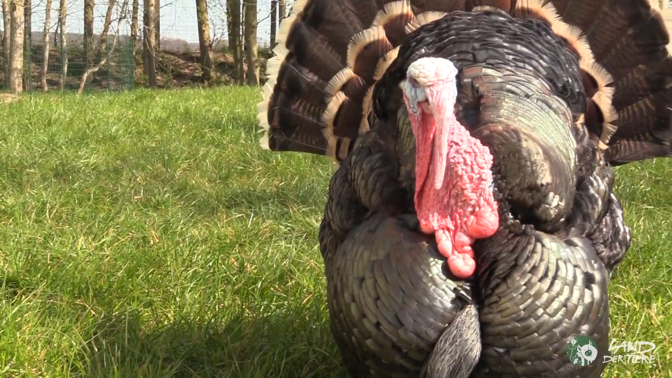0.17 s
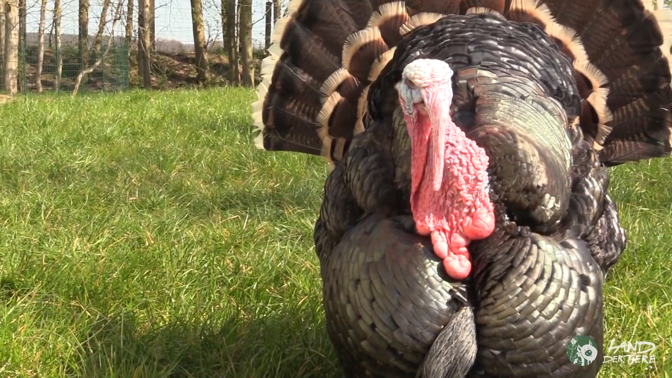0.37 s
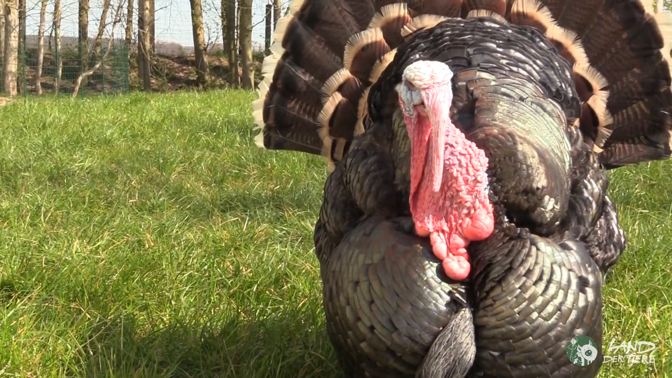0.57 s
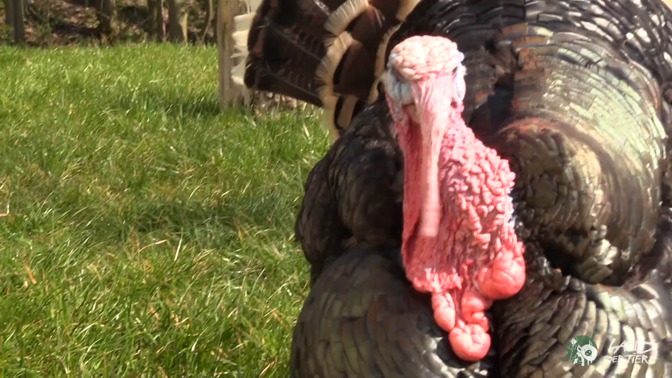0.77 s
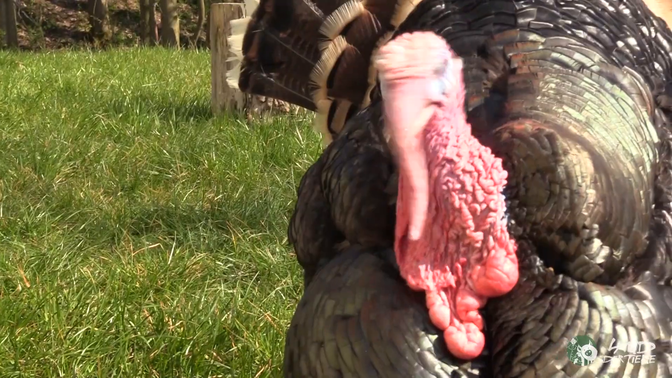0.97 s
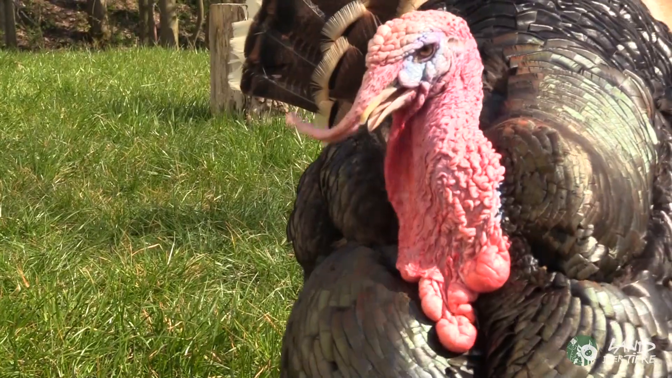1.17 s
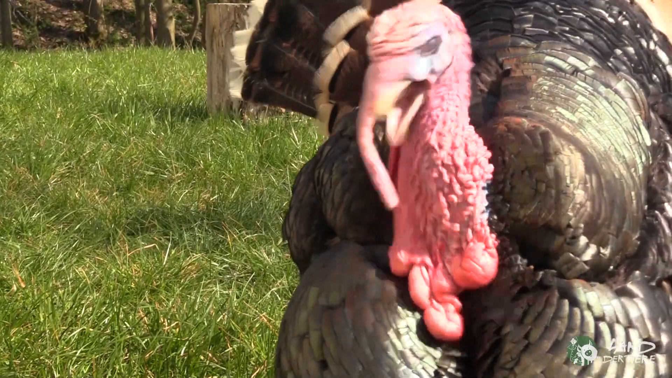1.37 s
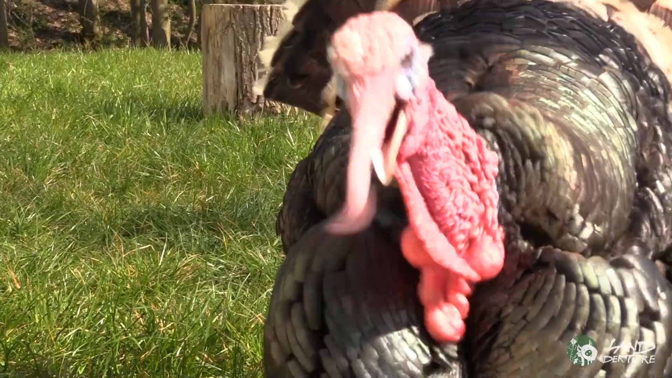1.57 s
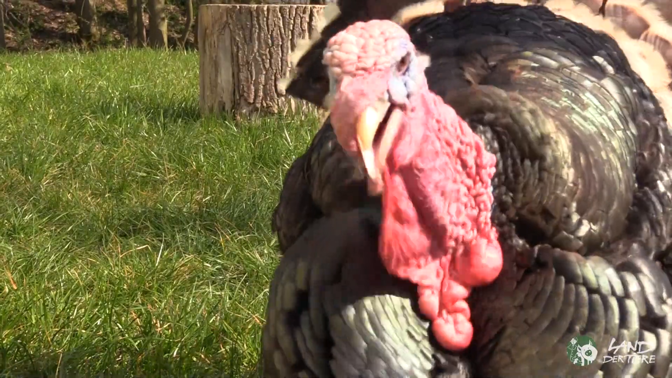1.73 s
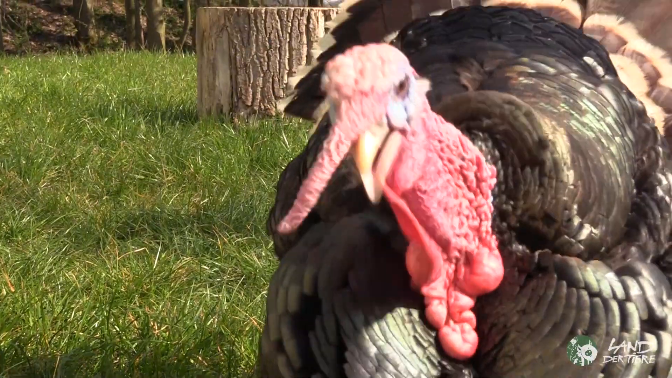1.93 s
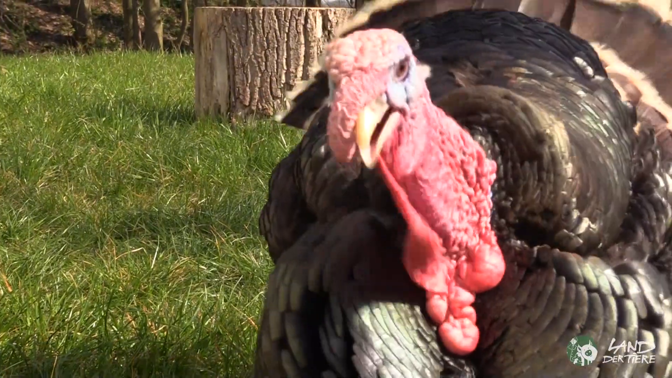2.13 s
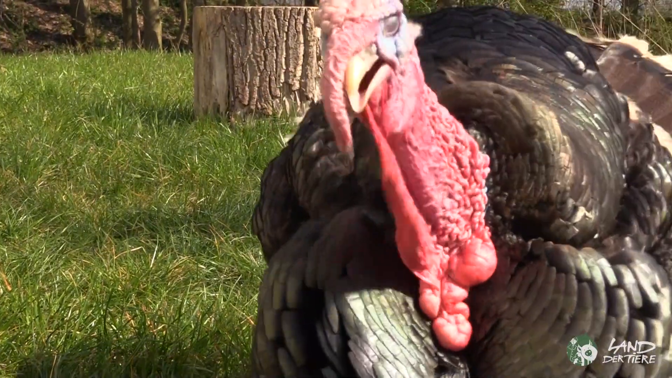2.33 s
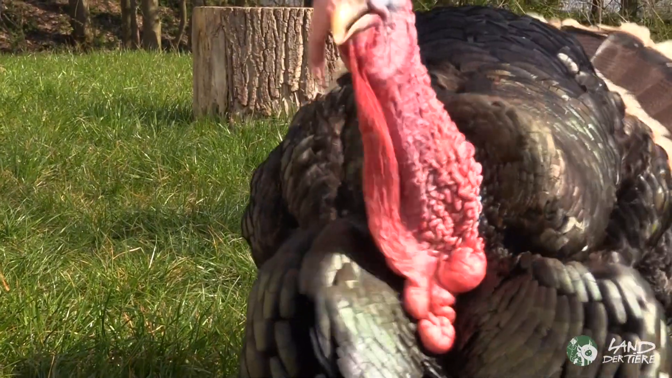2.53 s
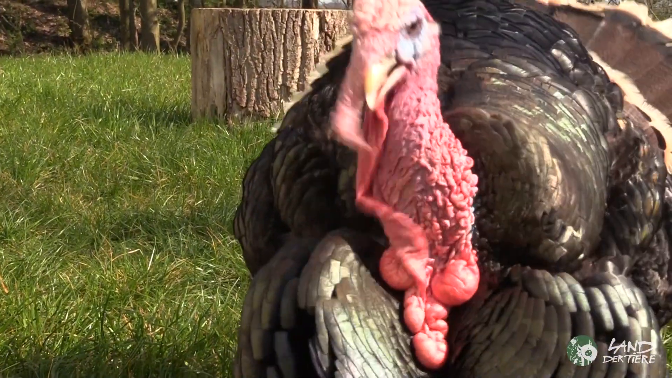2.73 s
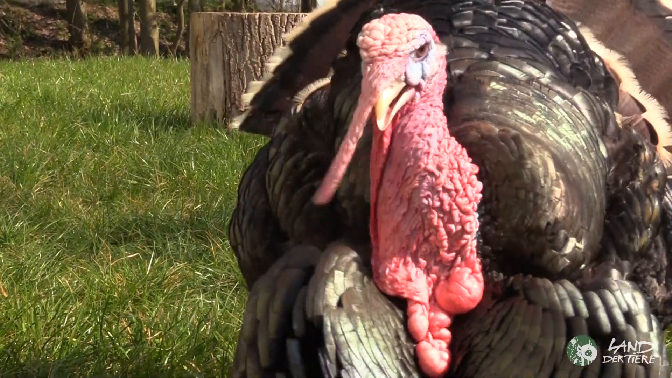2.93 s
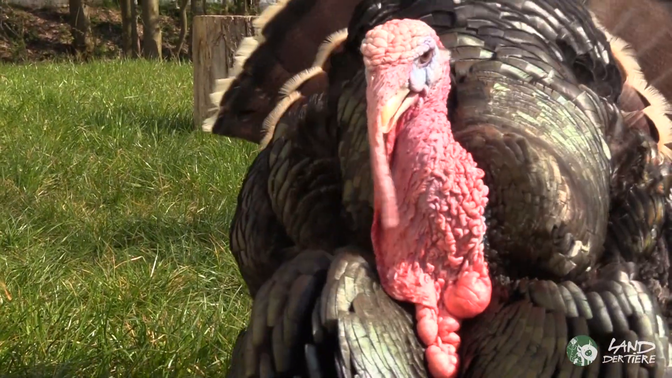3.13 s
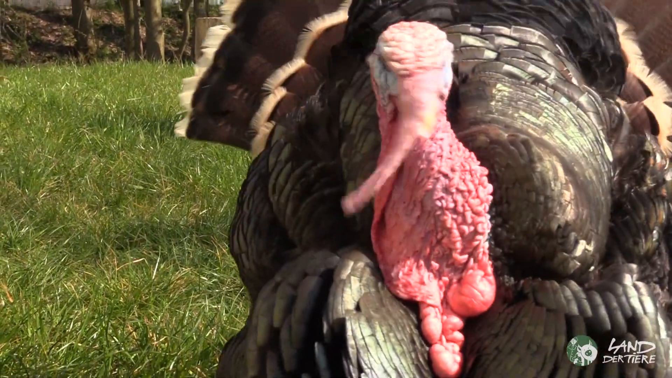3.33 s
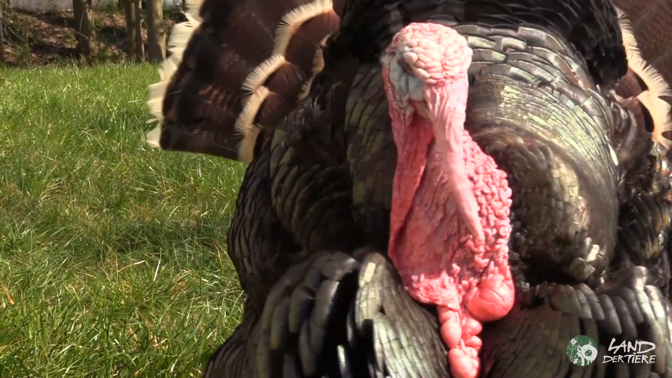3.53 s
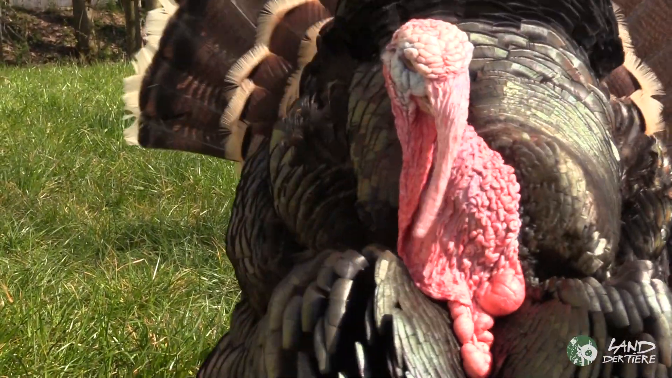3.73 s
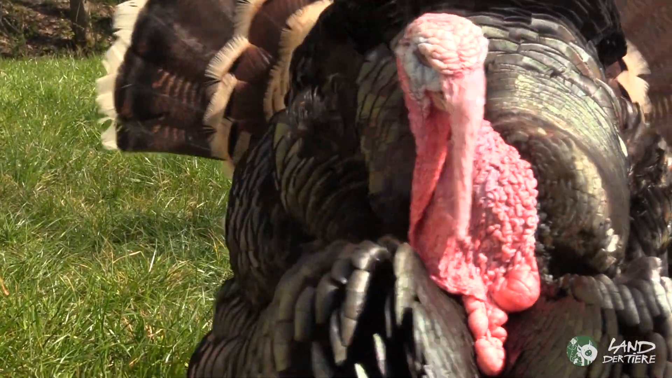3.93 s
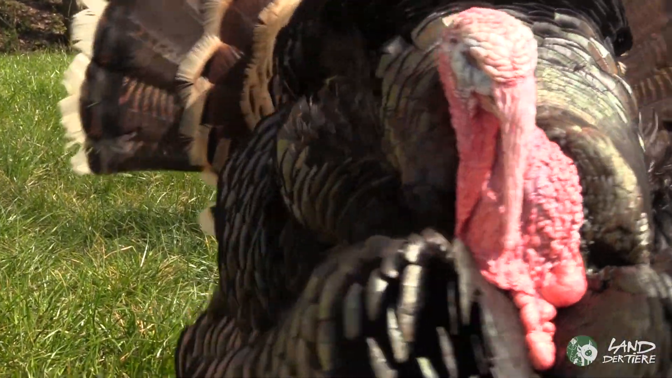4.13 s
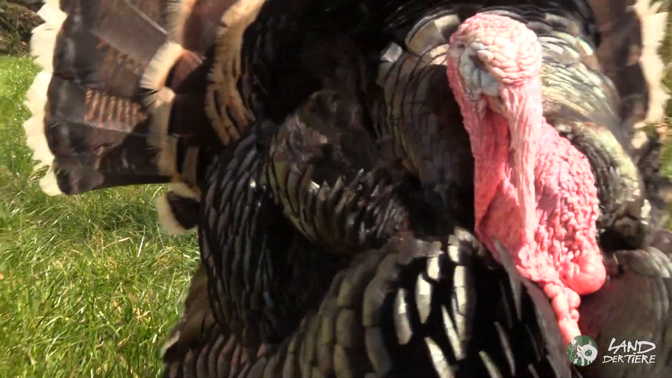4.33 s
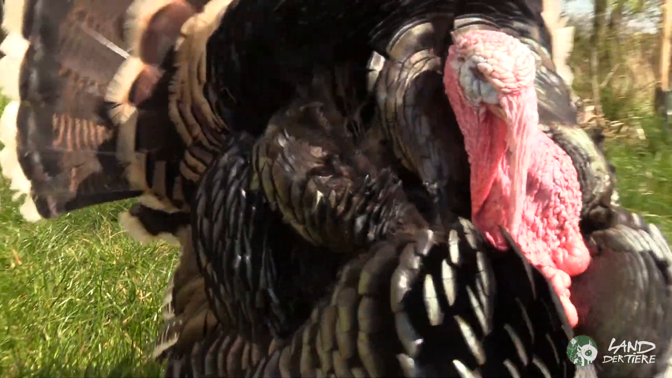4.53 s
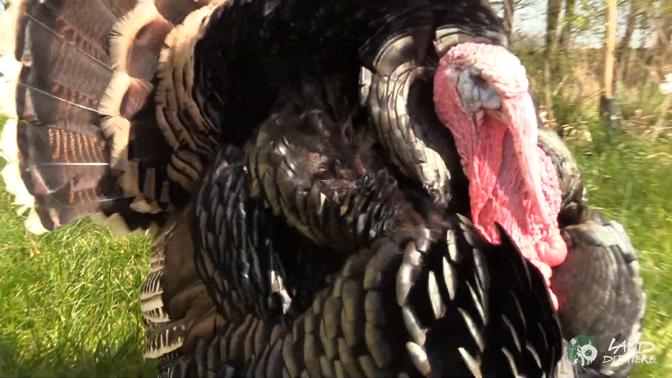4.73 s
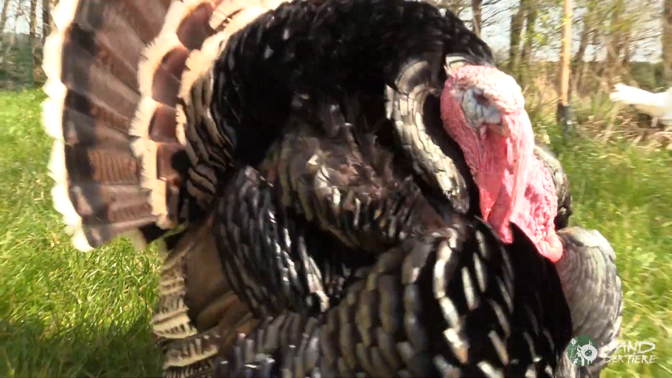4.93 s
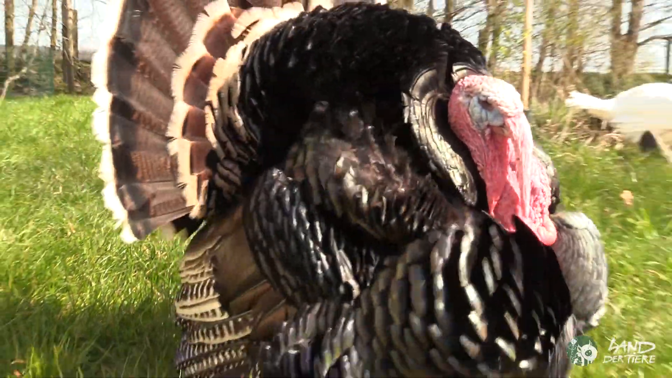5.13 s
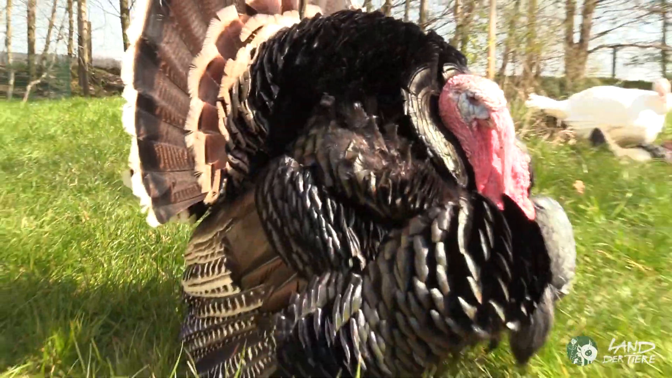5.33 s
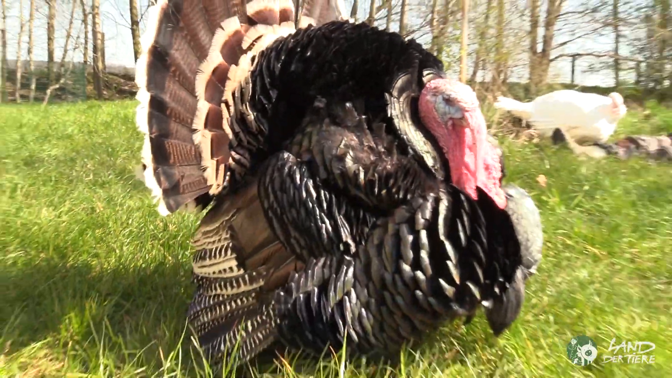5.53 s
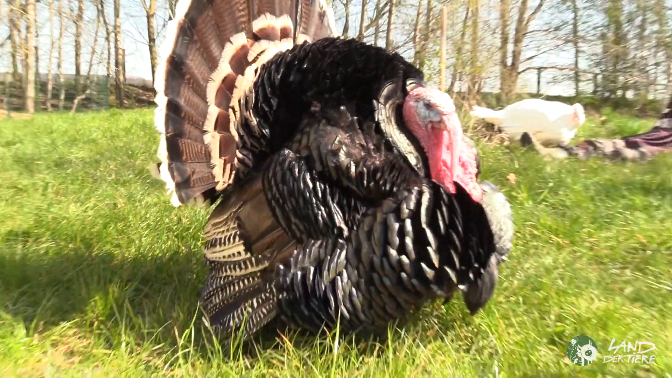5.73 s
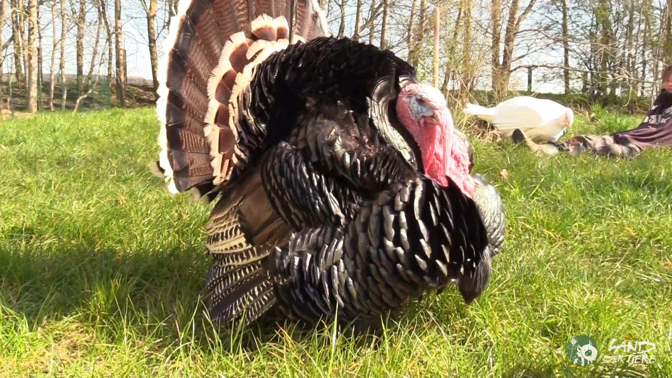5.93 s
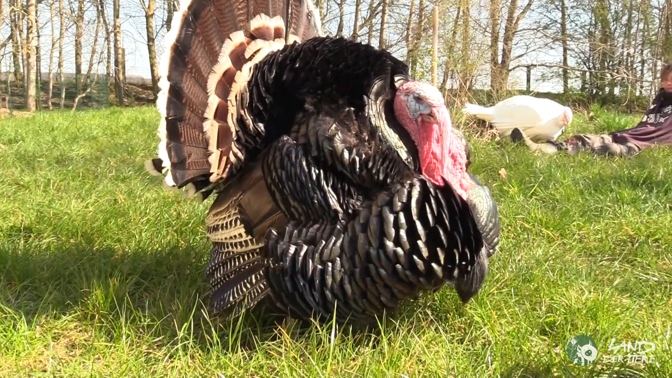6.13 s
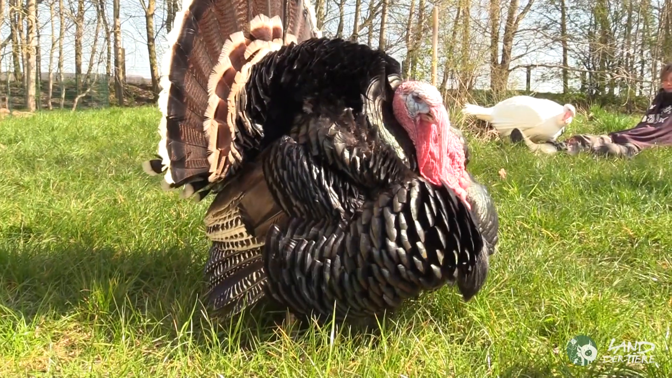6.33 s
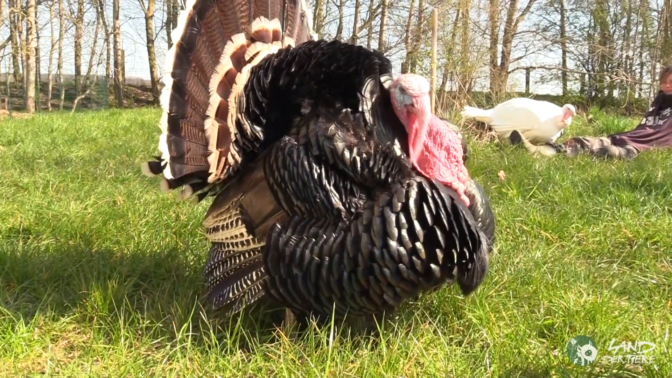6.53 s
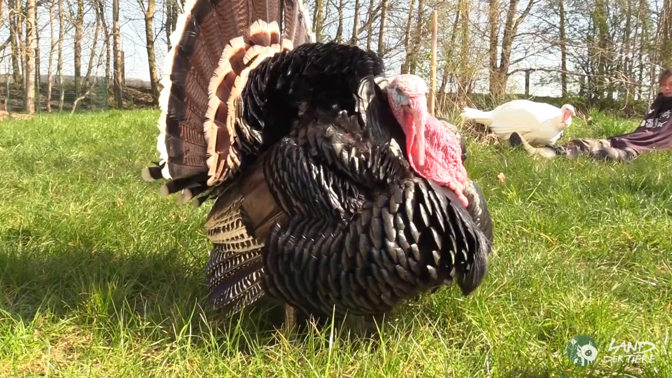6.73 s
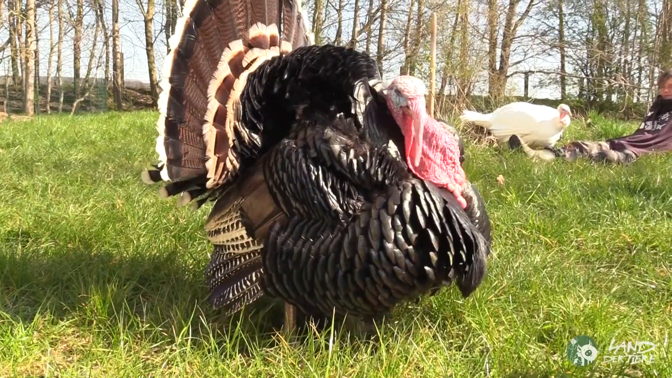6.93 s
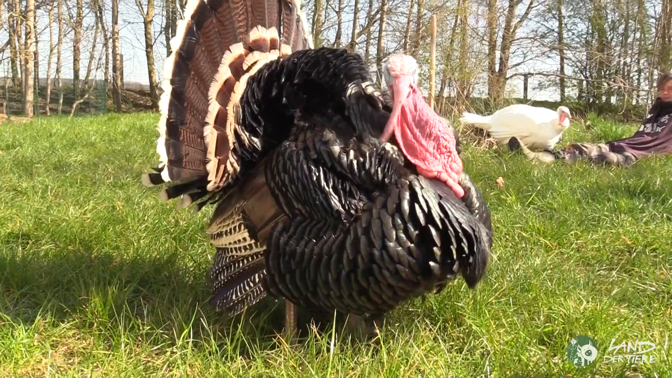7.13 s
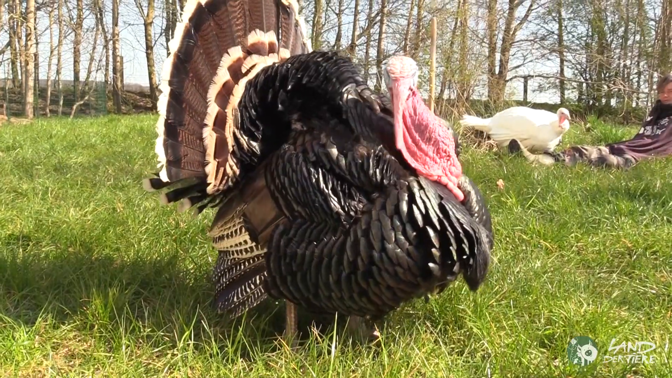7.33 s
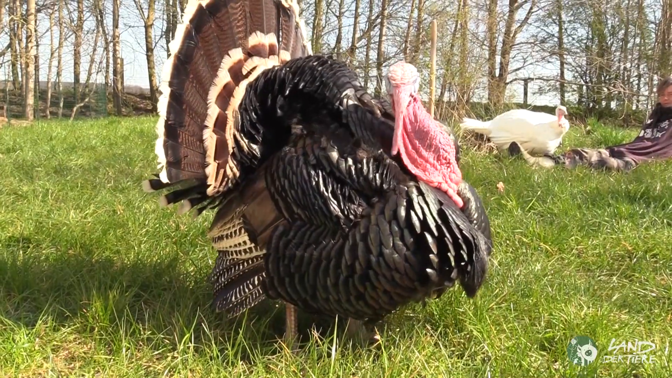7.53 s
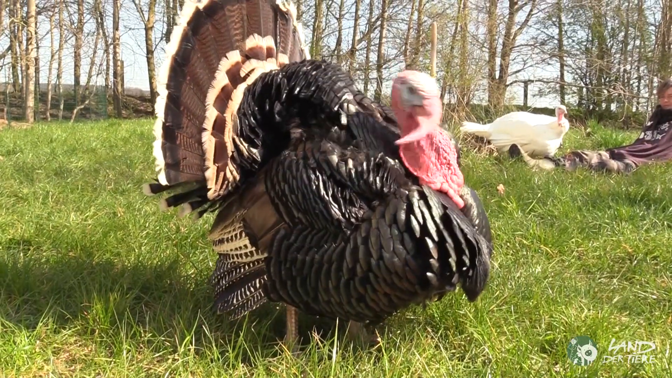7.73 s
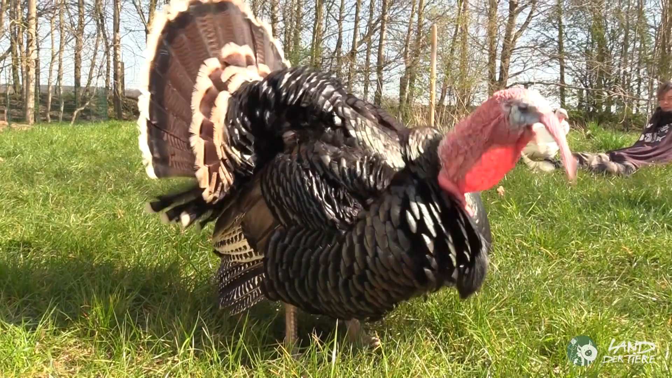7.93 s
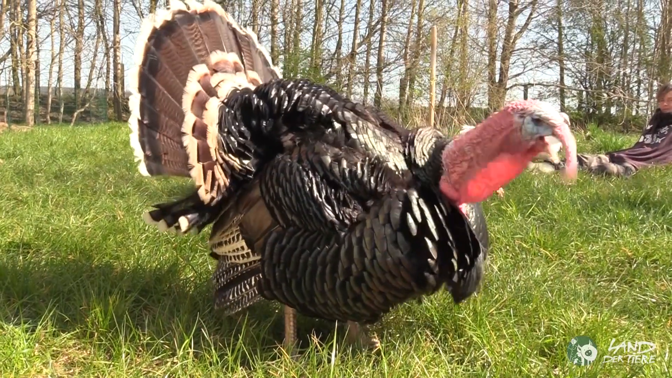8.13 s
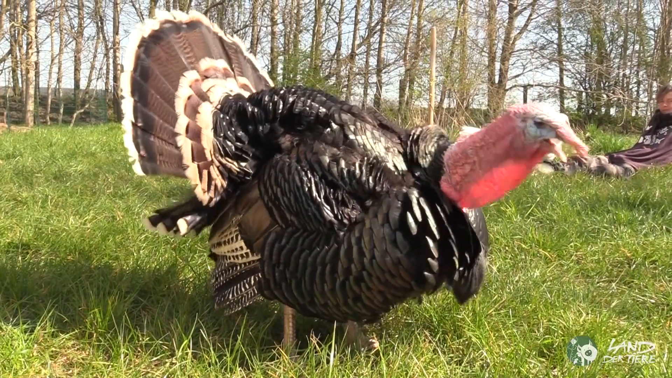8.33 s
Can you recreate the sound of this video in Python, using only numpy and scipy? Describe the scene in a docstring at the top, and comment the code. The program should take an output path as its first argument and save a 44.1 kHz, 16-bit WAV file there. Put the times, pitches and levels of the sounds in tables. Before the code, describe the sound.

Close, dry outdoor sound on an open meadow with soft airy background and a thin, short echo. A turkey clicks in his throat, gobbles harshly for just over a second, then falls quiet with feather rustle and small pops. A hissing spit comes with a low chest boom, later a pulsing drum note. After soft steps and plumage swishes he breaks into another rattling gobble.

```python
"""On a meadow, a tom turkey struts a metre or two from the microphone. He gobbles twice: the two sides of his
syrinx (voice box) trade low notes and falling yelps in a fast tumble, built from gliding stacks of harmonics.
Dry throat pops are short rings, spits are bursts of noise, and the deep chest drumming is a slow, pulsing tone.
Feet thud and feathers brush as shaped noise, over a quiet outdoor background, a faint hum and far-off songbirds.
A thin echo follows the voice."""
import sys
import numpy as np
from scipy import signal
from scipy.fft import rfft, irfft, next_fast_len
from scipy.io import wavfile
from scipy.ndimage import uniform_filter1d, minimum_filter1d

SR = 44100
rng = np.random.default_rng(int(sys.argv[2]) if len(sys.argv) > 2 else 0)


def unload_wav(signal):
    """Save mono or channel-first audio to the path in sys.argv[1] as 16-bit WAV at rate SR, clipped to [-1, 1]."""
    wavfile.write(
        sys.argv[1],
        SR,
        np.round(np.clip(np.atleast_2d(signal).T, -1, 1) * 32767).astype(np.int16),
    )


N = 369999
TIME = np.arange(N) / SR  # seconds
TOP_HZ = 15700  # the sound is cut above this
FOOT_HZ = 583.5  # low note that ends a yelp

# tone colour of air spat through the beak: f/Hz, level/dB
SPIT_COLOUR = [(290, -63), (500, -41), (737, -11), (1150, -25.5), (1450, -3), (1880, -7.5), (2540, 0.5),
               (3800, -8), (4600, -8), (5500, -19.5), (6900, -11.5), (8700, -22.5), (11500, -22),
               (15500, -40)]
# dull tone colour of a footfall, also used for flutter and shivering feathers: f/Hz, level/dB
STEP_COLOUR = [(30, -16.5), (80, -4), (170, -3.5), (330, -2), (520, -22.5), (1200, -14.5), (4000, -57)]
# bright tone colour of feathers, also used for cracks and crunches: f/Hz, level/dB
FEATHER_COLOUR = [(300, -17), (1200, -3.5), (3000, 2), (5000, -8), (8000, -6.5), (12000, -22), (16000, -48)]


def undb(db):
    """Turn decibels into a gain."""
    return 10 ** (np.asarray(db) / 20)


def unit(x):
    """Scale to an rms (average strength) of 1."""
    return x / np.sqrt(np.mean(x ** 2) + 1e-18)


def colour(points, hz):
    """Read the gain at the given frequencies from a list of (f/Hz, level/dB) points."""
    f, db = np.transpose(points)
    return undb(np.interp(np.log(np.maximum(hz, 1)), np.log(f), db))


def hiss(points, n):
    """Shape noise to a tone colour, with an rms of 1."""
    spectrum = rfft(rng.standard_normal(n))
    return unit(irfft(spectrum * colour(points, np.fft.rfftfreq(n, 1 / SR)), n))


def wide_hiss(points, n, width):
    """Make stereo noise; width is the share of its power in the left-right difference."""
    size = next_fast_len(n)
    mid = hiss(points, size)[:n]
    side = hiss(points, size)[:n]
    return np.sqrt(1 - width) * mid + np.sqrt(width) * np.array([side, -side])


def wobble(n, rate):
    """Join random values by straight lines, rate of them a second."""
    k = np.arange(n) * rate / SR
    count = int(k[-1]) + 2
    return np.interp(k, np.arange(count), rng.standard_normal(count))


def pan(db):
    """Give the left and right gains for a level difference, left minus right."""
    return undb(np.array([[db], [-db]]) / 2)


def add(out, s, x):
    """Mix x into out from time s (seconds) on."""
    i = max(int(s * SR), 0)
    out[:, i:i + x.shape[-1]] += x[..., :max(N - i, 0)]


def swishes(table, points, width, grain_db):
    """Grainy bursts of noise, each swelling and fading once."""
    out = np.zeros((2, N))
    for s, length, db in table:
        n = int(length * SR)
        swell = np.sin(np.linspace(0, np.pi, n))
        grain = undb(db + grain_db * wobble(n, 400))
        add(out, s, grain * swell * wide_hiss(points, n, width))
    return out


def background(rumble_db=2, air_db=1.0, grass_db=1, crackle_db=2):
    """Distant rumble, wide moving air and a fine crackle of grass and plumage, all noise of drifting level."""
    # levels before the gains above: t/s, distant rumble/dB, air/dB, hiss of grass and plumage/dB
    drift = [(0, -49.5, -44, -57), (.9, -52, -47.5, -59.5), (1.4, -52.5, -46.5, -59),
             (2.6, -61, -53.5, -64.5), (3.848, -59, -53, -68.5), (4.35, -51, -48.5, -59),
             (4.65, -49, -53, -52), (5.4, -49.5, -48, -61), (6.199, -48, -45, -61), (6.7, -53, -46, -58.5),
             (8.39, -50.5, -45, -58.5)]
    # tone colours: f/Hz, level/dB
    rumble_colour = [(25, -24.5), (60, -8), (130, -2), (220, 1.5), (400, -6), (700, -6), (1500, -31.5)]
    air_colour = [(260, -36), (450, -3.5), (994, -2), (1130, -4.5), (1360, 1), (1670, -7.5), (2050, -5.5),
                  (2920, -7.5), (3940, -12), (7000, -26), (9100, -55), (15400, -120)]
    grass_colour = [(2500, -16.5), (5000, 2.5), (6500, 3), (8500, 2.5), (11000, -2), (13500, -7),
                    (16000, -29.5)]
    s, *columns = np.transpose(drift)
    low, air, high = (np.interp(TIME, s, c) for c in columns)
    out = undb(low + rumble_db + 0.75 * wobble(N, 19)) * wide_hiss(rumble_colour, N, 0.25)
    out += undb(air + air_db + 1.6 * wobble(N, 36)) * wide_hiss(air_colour, N, 0.46)
    return out + undb(high + grass_db + crackle_db * wobble(N, 670)) * wide_hiss(grass_colour, N, 0.22)


def brushes():
    """Feathers brush past in soft, wide swishes of noise."""
    # t/s, length/s, level/dB
    strokes = [(.05, 0.37, -49), (3.04, 0.18, -53.5), (4.45, .08, -42), (4.5, 1, -49.5), (4.77, 0.065, -39),
               (4.88, 0.092, -41.5), (6.64, .14, -48), (7.048, 0.026, -33.5), (7.19, 0.3, -41.5)]
    return swishes(strokes, FEATHER_COLOUR, width=0.27, grain_db=2.5)


def steps(attack_s=0.00017, thump_hz=85):
    """Footfalls and jolts of the body: a soft, dying thud on turf with a crunch of grass blades."""
    # t/s, decay/s, level/dB, grass crunch over it/dB, ground thump over it/dB
    footfalls = [(0.401, 0.015, -28.5, -9, -27), (2.284, 0.009, -18.5, -22, -17),
                 (2.545, 0.019, -33, -20, -13.5), (3.509, 0.049, -40.5, -23, -29),
                 (6.141, 0.01, -29.5, -15, -22), (6.544, 0.013, -34.5, -8, -24),
                 (6.928, 0.083, -39.5, -29, -28), (7.067, 0.025, -29, -7.5, -3),
                 (7.415, 0.042, -37, -15, -29)]
    out, t = np.zeros((2, N)), np.arange(8192) / SR
    for s, decay, db, crunch_db, thump_db in footfalls:
        crunch = undb(crunch_db + 1.6 * wobble(len(t), 470)) * wide_hiss(FEATHER_COLOUR, len(t), 0.16)
        thump = undb(thump_db) * np.sin(2 * np.pi * thump_hz * t)
        thud = wide_hiss(STEP_COLOUR, len(t), 0.021) + thump
        envelope = (1 - np.exp(-t / attack_s)) * np.exp(-t / decay)
        add(out, s, undb(db) * envelope * (thud + crunch))
    return out


def pops(attack_s=0.000081, crack_s=0.0041, gain_db=2, puff_db=-9, puff_s=0.0041):
    """A puff bursts through the throat and rings it briefly at several pitches; the last burst, at 7.065 s, is
    a like click within a rustle of feathers and feet."""
    # t/s, peak before gain_db/dB, crack over the ring/dB, left minus right/dB
    bursts = [(0.664, -6.5, 0.5, 1), (0.752, -10.5, -5, 0.5), (3.327, -24.5, -7.5, 1),
              (3.348, -22, -1.5, -1), (3.372, -26, -33, 2), (3.41, -26.5, -23, 2), (3.512, -25.5, -16, 2),
              (3.536, -28.5, -16.5, -3), (4.172, -13.5, 9.5, 1.5), (5.471, -19.5, -3, -4),
              (5.804, -9, 0, 0.5), (5.826, -13.5, -4, 4), (7.065, -25, -6, 12)]
    # what a pop rings with, before random variation: f/Hz, level/dB, time to fall by 60 dB/s
    ring_modes = [(1558, 9.5, 0.028), (1914, -3.5, 0.029), (2240, 0.5, 0.022), (2634, 5.5, 0.025),
                  (3700, -7.5, 0.024), (4310, -2.5, 0.018), (7900, -19, 0.015)]
    out, t = np.zeros((2, N)), np.arange(4096) / SR
    for s, db, crack_db, pan_db in bursts:
        ring = np.zeros(len(t))
        for hz, mode_db, t60 in ring_modes:
            level = undb(mode_db + 2 * rng.standard_normal() - 60 * t / t60)
            pitch_hz = hz * (1 + 0.036 * rng.standard_normal())
            ring += level * np.sin(2 * np.pi * pitch_hz * t + rng.uniform(0, 2 * np.pi))
        puff = undb(puff_db) * np.exp(-t / puff_s) * hiss(SPIT_COLOUR, len(t))
        crack = undb(crack_db) * np.exp(-t / crack_s) * wide_hiss(FEATHER_COLOUR, len(t), 0.55)
        pop = (ring + puff + crack) * (1 - np.exp(-t / attack_s))
        add(out, s, undb(db + gain_db) * pan(pan_db) * pop / np.abs(pop).max())
    return out


def note(length, pitches, second_db, over_db, sizzle_db, rough, width,
         arch=0.69, bloom=0.28, shimmer=0.81, rasp=0.13, spread=0.71):
    """One note of the syrinx: gliding harmonics from a fluttering membrane, with a rasp of air once a cycle."""
    # colour of the voice's overtones and air: f/Hz, level/dB
    throat_colour = [(400, -28.5), (600, -3.5), (1400, -4.5), (1800, -2), (2200, -4.5), (2800, 0),
                     (3400, -12), (3900, -21.5), (4600, -13), (5600, -24), (6700, -19.5), (9000, -25),
                     (13000, -37), (16000, -47)]
    jitter_hz, rough_rasp = 101.5, 1.9  # both in full at roughness 1
    flicker_db, closing_rad = 4.5, .035
    n = int(length * SR)
    u = np.linspace(0, 1, n)
    # a smooth curve through the start, middle and end pitch
    hz = np.exp(np.polyval(np.polyfit([0, .5, 1], np.log(pitches), 2), u))
    phase = 2 * np.pi * np.cumsum(hz + rough * jitter_hz * wobble(n, 703)) / SR
    push = np.abs(np.sin(np.pi * u))  # air pressure rises and falls once
    swell = push ** arch * np.exp(shimmer * rough * wobble(n, 500))

    def throat(f):
        """Overtone gain; sizzle sets the level of the top octaves."""
        return colour(throat_colour, f) * undb(over_db + sizzle_db * np.clip(np.log2((f + 1) / 3500), 0, 1))

    k = np.arange(3, 28)[:, None]  # overtone numbers
    start_phase = rng.uniform(0, 2 * np.pi, k.shape)  # each overtone starts at a random phase
    # the membrane never closes twice alike: overtones flicker, the highest blur
    flicker = undb(flicker_db * np.array([wobble(n, 160) for _ in k]) - 1.5)
    closing = phase + closing_rad * wobble(n, 500)
    strength = flicker * throat(k * hz) * (k * hz < TOP_HZ)
    overtones = (strength * np.exp(1j * (k * closing + start_phase))).sum(0) * push ** bloom
    # width sets a phase difference between left and right; that of the overtones also wavers at random
    sides = np.array([[1j], [-1j]])
    angle = np.arcsin(np.sqrt(width))
    lowest_two = np.exp(1j * phase) + undb(second_db) * np.exp(2j * phase)
    tone = lowest_two * np.exp(sides * angle)
    tone = tone + overtones * np.exp(sides * (angle + spread * wobble(n, 69)))
    air = rng.standard_normal((2, n)) * .5 + rng.standard_normal(n)
    air = irfft(rfft(air) * throat(np.fft.rfftfreq(n, 1 / SR)), n)
    air = air * (1 + .5 * np.cos(phase))
    return swell * (tone.imag + (rasp + rough_rasp * rough) * air)


def glide(hz, octaves, bow=0):
    """Start, middle and end pitch of a note; bow (octaves) lowers both ends."""
    return hz * 2 ** np.array([-octaves / 2 - bow, 0, octaves / 2 - bow])


def placed(s, length, pitches, db, pan_db, voice, overlap_s=0.0018, **shape):
    """Start time and stereo sound of a note lengthened a little at both ends."""
    sound = note(length + 2 * overlap_s, pitches, *voice, **shape)
    return s - overlap_s, undb(db) * pan(pan_db) * sound


def gobbles(flap_db=-33, voice_db=1.0, cut_hz=440):
    """Low notes and yelps run into each other; the shaking neck and wattle add a dull flutter."""
    out = undb(voice_db) * (openings() + yelps() + buzzes() + clear_notes())
    # the small beak radiates little below the lowest note
    out = signal.sosfiltfilt(signal.butter(6, cut_hz, "high", fs=SR, output="sos"), out)
    effort = np.sqrt(np.abs(uniform_filter1d(out[0] ** 2, size=1500)))
    return out + undb(flap_db) * effort * wide_hiss(STEP_COLOUR, N, 0.048)


def openings(width=0.028):
    """A gobble starts with a rasp, a bright buzz and a rising run that tips over."""
    # both gobbles begin with the same run: t/s, pitch ratio, level/dB, left minus right/dB
    starts = [(1.417, 0.99, 0.5, 0), (7.78, 0.99, -0.5, -2)]
    # its notes: t after the start/s, length before overlap/s, f before the ratio/Hz, glide/octaves, level/dB,
    # second harmonic over it/dB, overtones over it/dB, sizzle/dB, roughness 0-1
    run = [(0, .024, 684, 0.042, -8, -3, -12, -11.5, 0.88),
           (0.018, 0.031, 528.5, -0.079, -19, -1, 16, -19, 0.18),
           (0.049, 0.024, 675, 0.0057, -15.5, 7, 0, -15, 0.4),
           (0.061, 0.031, 729, 0.22, -13.5, 6, -26.5, 17, 0.2),
           (0.093, .02, 1175, .13, -12, -37, 1, -6.5, .4), (0.103, .017, 715, -0.53, -5, -19, -23, 8.5, 0),
           (0.12, 0.02, 619, 0.315, -14.5, -19, -9, -16, 0.2)]
    out = np.zeros((2, N))
    for start, ratio, gain_db, pan_db in starts:
        for s, length, hz, octaves, db, *voice in run:
            pitches = glide(hz * ratio, octaves)
            add(out, *placed(start + s, length, pitches, db + gain_db, pan_db, (*voice, width),
                             arch=1.0, rasp=0.19))
    return out


def yelps():
    """The syrinx slackens: the pitch enters high, slides to a ledge and drops to a low foot."""
    # t of the slide/s, slide/s, ledge f/Hz, hold/s, then entry, slide, ledge and foot level/dB,
    # left minus right/dB
    falls = [(1.574, 0.0076, 1210, .011, -14.5, -4.5, -4.5, -12, -1),
             (1.781, 0.012, 1087, 0.012, -16.5, -13, -3.5, -20, 1.5),
             (1.828, .011, 1120, .016, -27, -10.5, -9.5, -16.5, 3),
             (1.968, 0.0099, 1095, .019, -26.5, -16.5, -3, -19, 4),
             (2.029, .010, 997, .010, -15, -4, -3, -12.5, 0),
             (2.125, .012, 1083, .013, -32, -18, -5.5, -21, 4.5),
             (2.181, 0.012, 1011, 0.017, -21, -16.5, -4.5, -12, 2.5),
             (2.243, .01, 953, .009, -12, -8.5, -3.5, -13.5, -1),
             (2.381, 0.01, 975, .015, -35, -16, -7.5, -27.5, 0),
             (2.429, .009, 1500, .009, -16, -21.5, -21.5, -43.5, 2),
             (2.619, .009, 1238, .014, -35, -12, -3.5, -34, 0),
             (7.936, .008, 1307, .018, -18, -18, -5.5, -18.5, -3.5),
             (7.99, 0.0091, 1097, .013, -22, -6.5, -10.5, -9, -4),
             (8.203, 0.0066, 1044, .012, -18, -1.5, 5, -13.5, -4)]
    # voice of each of the four stages: second harmonic/dB, overtones/dB, sizzle/dB, roughness 0-1, width 0-1
    stage_voices = [(-11, 0.5, -2.5, .36, .08), (-5.5, 0, -6.5, .32, 0.07), (-15.5, -6, -12, .3, 0.1),
                    (-12.5, -10, -20, 0, 0)]
    entry_hz, break_hz = 2551, 1906
    entry_s, foot_s, legato_s = .012, .02, .004  # legato pulls the stages together
    foot_octaves, ledge_octaves, landing_ratio = -.17, -.12, 1.12
    out = np.zeros((2, N))
    for s, slide, ledge_hz, hold, *levels, pan_db in falls:
        stages = [(s - entry_s + legato_s, entry_s, np.geomspace(entry_hz, break_hz, 3)),
                  (s, slide, np.geomspace(break_hz, ledge_hz * landing_ratio, 3)),
                  (s + slide - legato_s / 2, hold, glide(ledge_hz, ledge_octaves)),
                  (s + slide + hold - 2 * legato_s, foot_s, glide(FOOT_HZ, foot_octaves))]
        for stage, db, voice in zip(stages, levels, stage_voices):
            add(out, *placed(*stage, db, pan_db, voice, rasp=0.28, bloom=.7))
    return out


def buzzes(bow=.03, width=0.083):
    """Between yelps the membrane slaps shut in every cycle: low notes rich in overtones."""
    # t/s, length before overlap/s, f/Hz, glide/octaves, level/dB, second harmonic over it/dB,
    # overtones over it/dB, sizzle/dB, roughness 0-1, left minus right/dB
    rich_notes = [(1.6, 0.034, 807, -0.16, -21.5, 6, 4, -7, .9, 9),
                  (1.652, 0.047, 715, -0.048, -16.5, 3, -3, -7, 0.45, 1),
                  (1.699, 0.03, 715.5, 0.17, -17.5, 12, 12.5, -10.5, 0.31, -1),
                  (1.845, 0.047, 682, -0.31, -18.5, -2.5, 4, -1, 0.38, 4),
                  (1.888, 0.053, 639.5, 0.15, -1.5, 0, -3.5, -11.5, 0.21, -1),
                  (2.061, 0.056, 630, -0.19, -15.5, -2, -2, 0, 0.31, 5),
                  (2.288, 0.032, 629, 0.15, -3, -4, -3, 0, 0.2, 3.5),
                  (8.029, 0.031, 727, 0.0026, -21.5, 11.5, -4, -19, 0.45, -3),
                  (8.057, 0.047, 704, 0.46, -15.5, 7, 6, -10.5, 0.13, .5),
                  (8.175, 0.028, 574, 0.072, -23, -21, -2.5, -12, 0.5, -4),
                  (8.245, 0.053, 593.3, 0.14, -12, -2.5, 2.5, -9, 0.46, 0),
                  (8.278, 0.036, 624, 0.22, -24.5, 5.5, 2, -11, 0.35, 8),
                  (8.319, 0.059, 739, 0.15, -24, 1, 11, 1.5, 0.22, 3.5),
                  (8.357, 0.036, 648, -0.21, -24.5, 0.5, 5.5, -17, 0.32, 6)]
    out = np.zeros((2, N))
    for s, length, hz, octaves, db, *voice, pan_db in rich_notes:
        add(out, *placed(s, length, glide(hz, octaves, bow), db, pan_db, (*voice, width)))
    return out


def clear_notes(second_db=-17, second_db_per_octave=-5, over_db=-24, over_db_per_rough=24,
                sizzle_db=-5, low_width=.02, width_per_rough=0.36):
    """The other side of the syrinx holds one resonance; rougher notes are brighter and wider, higher ones purer."""
    # t/s, length before overlap/s, f/Hz, glide/octaves, level/dB, roughness 0-1, left minus right/dB
    pure_notes = [(1.606, 0.02, 2745, -0.24, -9, 0.2, 3), (1.63, 0.016, 1233, 0.26, -3, 0.7, 1),
                  (1.64, 0.018, 618, 0.37, -5.5, 0, -1), (1.685, 0.022, 866, 0.57, -5.5, 0.58, -1),
                  (1.729, 0.021, 604, -0.25, -5, 0.15, 0), (1.767, 0.012, 2780, -.08, -9, 0.3, 9),
                  (1.805, 0.038, 1130, -0.22, -3, 0.28, -2.5), (1.93, 0.022, 595, 0.15, -8.5, 0.06, 1),
                  (2.058, 0.015, 950, 0.39, 3.5, 0.14, 4.5), (2.126, 0.039, 579, -0.13, -2, 0, -0.5),
                  (2.248, 0.025, 2730, 0, -18, .05, 5), (2.285, 0.016, 1032, 0.22, 1.5, 0.44, 3.5),
                  (2.316, 0.046, 598.6, -0.19, -3, 0.07, -1), (2.363, .014, 1060, -.15, -6, 0.42, 1),
                  (2.39, 0.02, 2627, .05, -12, 0.14, 3.5), (2.407, 0.015, 1180, -0.33, -10.5, 0.6, 2),
                  (2.438, 0.0081, 3215, -.03, -13, .1, 2), (2.554, 0.0033, 695, 0.44, -2, 0, -1),
                  (2.556, 0.032, 713, 0.11, -1, 0.08, 0), (2.591, .008, 669, .08, -7.5, 0.2, 0.5),
                  (7.637, 0.048, 653, -.15, -34.5, 0, 9), (7.697, 0.03, 633, -0.18, -36, 0, 6),
                  (7.833, 0.014, 950, 0.11, -8.5, 0.05, -3), (7.94, .013, 3000, -.05, -9, .2, -2),
                  (7.943, .02, 672.3, -0.48, -4, 0.08, 2), (7.978, 0.0093, 2660, 0, -9.5, .05, -3),
                  (8.033, 0.037, 946, -0.0067, -13, 0.63, 0), (8.098, 0.043, 1051, -0.12, -6, 0.31, 3),
                  (8.099, .017, 606, -0.26, -6, 0.14, -2), (8.125, 0.034, 749, 0.049, -10.5, 0.2, 4),
                  (8.149, 0.03, 836, -0.034, -10.5, 0.58, 3), (8.216, 0.039, 1130, 0.099, -13, 0.33, -2),
                  (8.274, 0.014, 1110, -0.12, 4, 0.4, 0), (8.297, 0.025, 623, -0.27, -6, .1, -3),
                  (8.361, 0.012, 1024, -0.12, -8.5, 0.42, -3)]
    out = np.zeros((2, N))
    for s, length, hz, octaves, db, rough, pan_db in pure_notes:
        second = second_db + second_db_per_octave * np.log2(hz / FOOT_HZ)
        over = over_db + over_db_per_rough * rough
        voice = (second, over, sizzle_db, rough, low_width + width_per_rough * rough)
        add(out, *placed(s, length, glide(hz, octaves), db, pan_db, voice, rasp=0.68, arch=0.86))
    return out


def meadow(x, t60_s=0.43, early_t60_s=0.11, echo_db=-17.5):
    """Fence, stumps and trees scatter a thin, dull echo: noise that dies away fast, then more slowly."""
    t = np.arange(SR // 2) / SR
    echo_colour = [(200, -11.0), (700, 2.0), (3000, 5), (6000, -0.5), (15000, -5.0)]  # f/Hz, level/dB
    tail = wide_hiss(echo_colour, len(t), 0.25)
    tail = tail * np.clip(t / 0.0071, 0, 1) * (undb(-60 * t / t60_s) + 4.3 * undb(-60 * t / early_t60_s))
    tail = tail / np.sqrt(np.sum(tail[0] ** 2))
    return undb(echo_db) * signal.fftconvolve(x.mean(0)[None], tail, axes=1)[:, :N]


def drum(second_db=-18, third_db=-19, quiver_db=5.5, rattle_db=-20):
    """The chest booms at a low pitch that sags, then rises late; the feathers shiver with each cycle."""
    # long drumming, before the quiver: t/s, f/Hz, level/dB
    long_drumming = [(4.9, 72.0, -60), (5.008, 75.5, -52), (5.078, 67.2, -52), (5.138, 65.8, -43),
                     (5.648, 63.24, -37), (5.77, 69.5, -31.5), (5.864, 76.2, -40), (5.95, 73.3, -61)]
    # single booms after a call or spit: t/s, level/dB
    single_booms = [(2.599, -41), (4.535, -28.5)]
    boom_hz, attack_s, decay_s = 71.4, .015, 0.036
    s, hz, db = np.transpose(long_drumming)
    pitch_hz = np.interp(TIME, s, hz, left=boom_hz) * (1 + 0.0067 * wobble(N, 30))
    phase = 2 * np.pi * np.cumsum(pitch_hz) / SR
    boom = np.sin(phase) + undb(second_db) * np.sin(2 * phase) + undb(third_db) * np.sin(3 * phase)
    shiver = undb(rattle_db) * (1 + np.sin(phase)) * wide_hiss(STEP_COLOUR, N, 0.043)
    force = undb(np.interp(TIME, s, db, left=-120, right=-120))
    for start, boom_db in single_booms:
        age = np.maximum(TIME - start, 0)
        force = force + undb(boom_db) * np.minimum(age / attack_s, np.exp((attack_s - age) / decay_s))
    return np.sqrt(2) * force * undb(quiver_db * wobble(N, 25)) * (boom + shiver)


def spits():
    """Air spat through the beak makes very short bursts of noise."""
    # t/s, length/s, level/dB
    spurts = [(4.124, 0.032, -31), (4.506, 0.02, -11.5), (4.522, 0.022, -12.5), (4.535, 0.023, -22),
              (5.818, 0.012, -29.5)]
    return swishes(spurts, SPIT_COLOUR, width=0.085, grain_db=1.5)


def hum(waver=0.0398, swell_db=3.0, start_s=4.13, end_s=6.43, fade_s=0.24):
    """Two faint low tones waver in pitch, swell and fade."""
    # f before wavering/Hz, level before swelling/dB
    low_tones = [(193, -52), (280, -52.5)]
    fade = np.clip(np.minimum(TIME - start_s, end_s - TIME) / fade_s, 0, 1)
    out = np.zeros(N)
    for hz, db in low_tones:
        phase = 2 * np.pi * np.cumsum(hz * (1 + waver * wobble(N, 40))) / SR
        out += undb(db + swell_db * wobble(N, 20)) * np.sin(phase)
    return fade * out


def songbirds(db=-51, waver=0.029):
    """Far-off birds whistle short slurs among the trees: sine tones that glide and waver (octaves)."""
    # t/s, length/s, middle f/Hz, glide/octaves
    whistles = [(6.667, 0.14, 2750, 0.069), (6.828, 0.061, 3000, -0.36), (6.985, 0.084, 2800, .35),
                (7.095, 0.057, 2700, -0.325), (7.153, 0.098, 2900, .35), (6.3, 0.088, 3120, -0.25),
                (6.72, .07, 2590, -.15)]
    out = np.zeros((2, N))
    for s, length, pitch_hz, octaves in whistles:
        u = np.linspace(0, 1, int(length * SR))
        hz = pitch_hz * 2 ** (octaves * (u - .5) + waver * wobble(len(u), 230))
        add(out, s, undb(db) * np.sin(np.pi * u) * np.sin(2 * np.pi * np.cumsum(hz) / SR))
    return out


def scene():
    """The bird, the echo of his voice and the field around him."""
    voice = gobbles() + pops() + spits()
    body = drum() + steps() + brushes()
    return voice + meadow(voice) + body + background() + hum() + songbirds()


def record(dry, ceiling=1.0):
    """The microphone pair colours the stereo width; a fast limiter holds the loudest notes; the top is cut."""
    # how strongly the pair picks up sound from the sides: f/Hz, level/dB
    side_pickup = [(100, -4.5), (220, -6), (400, 4.5), (600, -4), (800, 1.5), (1100, 4), (2000, -2),
                   (2700, -4.5), (3500, -1), (4700, 2.5), (6500, -1.5), (13000, -4)]
    size = 2 ** 19
    side = rfft((dry[0] - dry[1]) / 2, size) * colour(side_pickup, np.fft.rfftfreq(size, 1 / SR))
    side = irfft(side)[:N]
    heard = dry.mean(0) + np.array([side, -side])
    gain = np.minimum(1, ceiling / (np.abs(heard).max(0) + 1e-9))
    gain = uniform_filter1d(minimum_filter1d(gain, size=200), size=200)
    top_cut = signal.ellip(8, .2, 70, TOP_HZ, fs=SR, output="sos")
    return signal.sosfilt(top_cut, heard * gain)


dry = scene()
out = record(dry)
unload_wav(out)
```